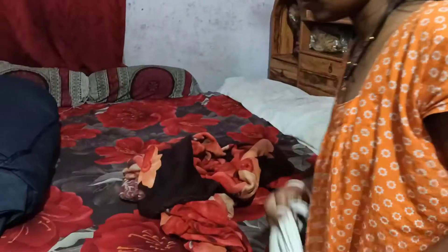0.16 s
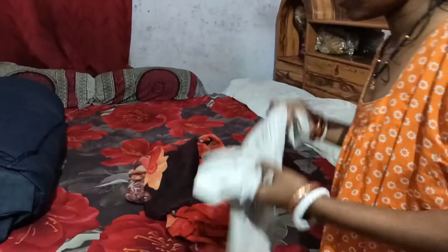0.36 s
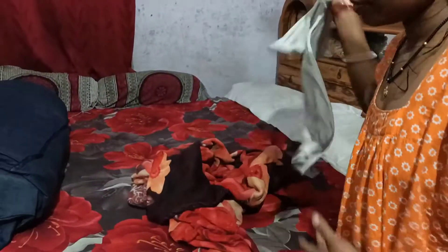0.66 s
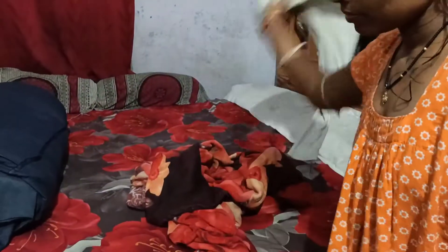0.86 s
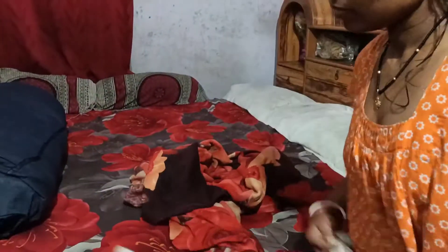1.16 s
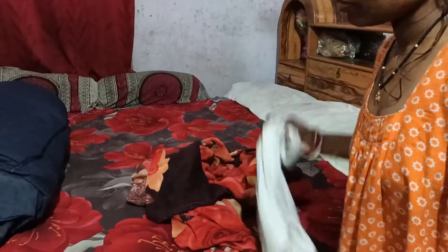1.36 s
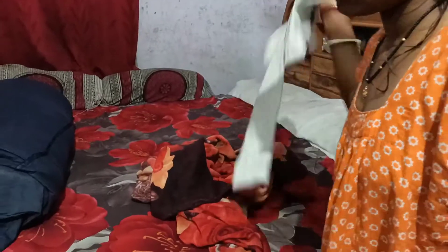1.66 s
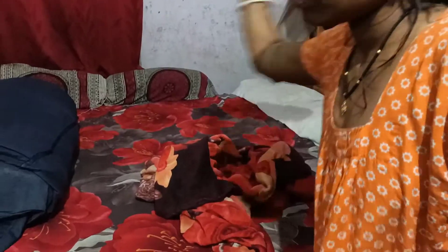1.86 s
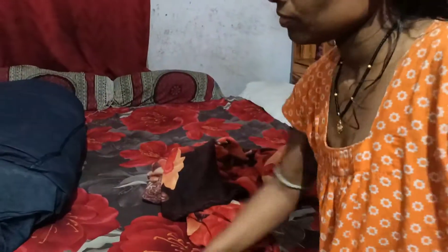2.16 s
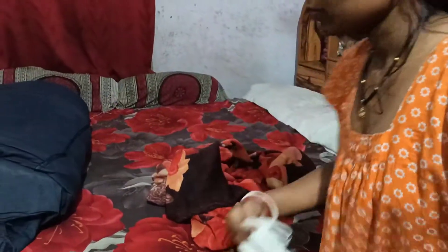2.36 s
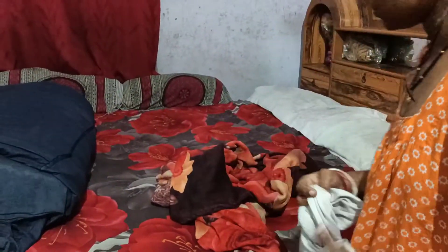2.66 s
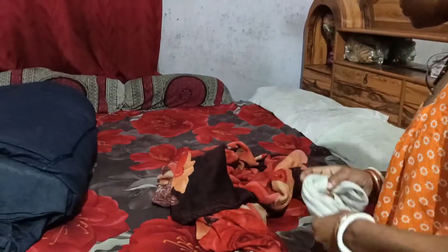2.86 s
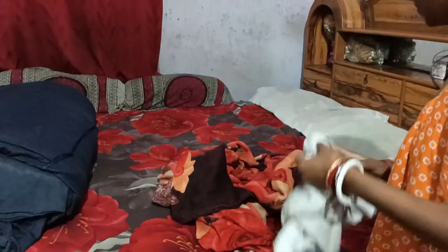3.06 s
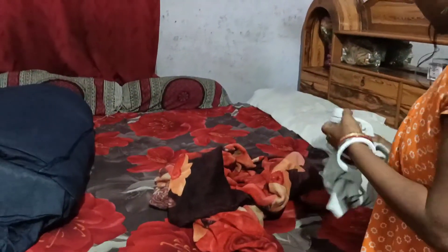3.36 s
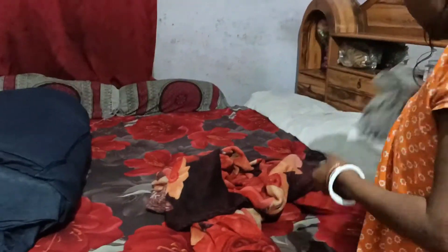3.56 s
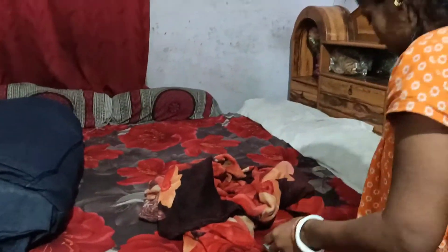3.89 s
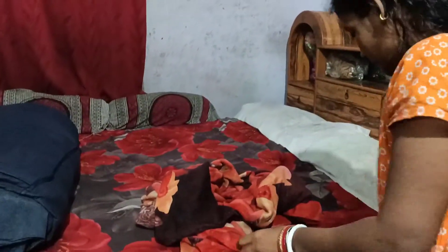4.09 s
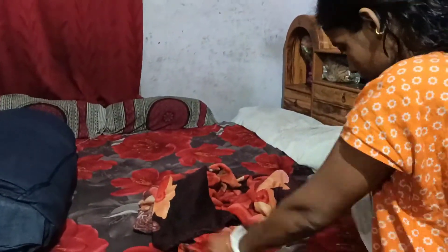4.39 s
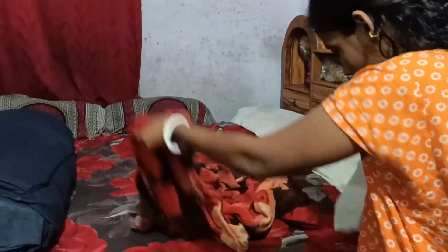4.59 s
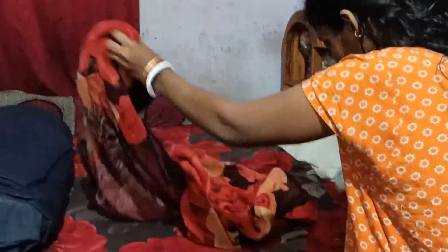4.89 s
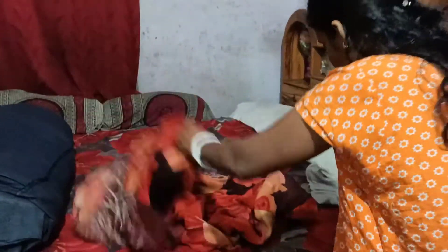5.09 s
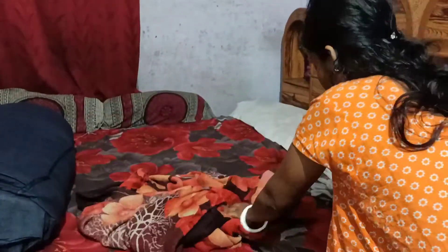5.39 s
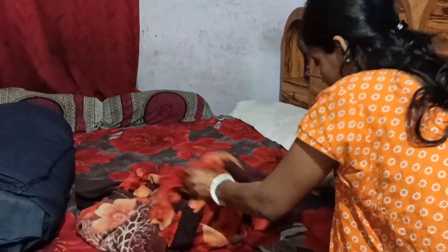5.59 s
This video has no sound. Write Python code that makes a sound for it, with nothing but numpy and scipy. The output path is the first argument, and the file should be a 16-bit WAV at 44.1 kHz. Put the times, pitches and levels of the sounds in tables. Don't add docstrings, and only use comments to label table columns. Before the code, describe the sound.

In a furnished bedroom, a cloth is shaken out with low thumping pops and whip-like cracks, the loudest around one and two seconds, as bangles rattle brightly. Then it quietens to sparse clicks and thin, short rings as hands gather and sort fabric. A distant horn toots very faintly outside. Close handheld stereo recorder, with dull low hum and noise suppression.

```python
import sys
import numpy as np
from scipy import signal
from scipy.io import wavfile
from scipy.ndimage import uniform_filter1d, minimum_filter1d

SR = 44100
rng = np.random.default_rng(int(sys.argv[2]) if len(sys.argv) > 2 else 0)


def digitize_waveform(pressure):
    field = np.atleast_2d(pressure).T
    bounded = np.clip(field, -1, 1)
    quanta = np.round(bounded * 32767).astype(np.int16)
    wavfile.write(sys.argv[1], SR, quanta)


def volts_from_db(level):
    exponent = np.asarray(level, float) / 20
    return 10 ** exponent


N = 253134

# (time [s], level [dB])
OPENING = [(0.0, -54), (0.59, -58.5), (0.8, -63), (1.04, -60.5), (1.3, -59), (1.49, -56.5), (1.61, -56.5),
           (1.76, -63.5), (2.03, -60), (2.58, -57), (2.68, -61.5), (2.88, -61), (3.42, -58.5), (3.6, -61),
           (4.28, -57), (5.28, -57.5), (5.36, -62), (5.74, -58.5)]
# (frequency [Hz], density [dB per Hz])
HUM_SPECTRUM = [(12, -46), (20, -16.5), (108, -6), (198, -22), (220, -20.5), (298, -12.5), (370, -18.5),
                (403, -15.5), (582, -19), (1950, -14), (2320, -26), (3070, -28), (3500, -27), (4550, -51),
                (7700, -120)]
# (time [s], level [dB])
GUSTS = [(0.0, -27), (1.13, -32), (1.49, -61.5), (2.26, -29), (2.581, -59.5), (4.14, -74)]
# (frequency [Hz], level in echoes [dB], t60 [s], level in hum [dB])
ROOM_MODES = [(53.7, 1.5, 0.55, -5.5), (100, -9, 0.45, 5), (134.4, 8.5, 0.19, -3), (185.5, -3, 0.44, -11),
              (228, -7.5, 0.36, -7), (300, 3.5, 0.24, 1), (330.4, 2, 0.28, -11.5), (421.5, -11, 0.46, 1),
              (468, -6.5, 0.38, -10), (540, -5, 0.13, -12), (540, -7, 0.094, -13.5)]
# (frequency [Hz], level [dB], t60 [s])
AFTERMATH = [(49.5, -32.5, 0.79), (128.6, -12.5, 0.23), (264, -28, 0.27), (358, -29.5, .2),
             (496.5, -31.5, 0.34)]
# (frequency [Hz], t60 [s])
ROOM_T60 = [(40, 0.6), (110, 0.38), (280, 0.32), (740, 0.29), (1940, 0.3), (5120, 0.25), (13500, 0.2)]
# (delay [s], level [dB])
ECHOES = [(.0058, -15), (.0105, -18), (.029, -19)]
# (frequency [Hz], correlation [-1..1])
LIKENESS = [(40, .99), (130, .93), (290, .86), (640, .7), (1410, -.15), (3100, 0), (15000, 0)]
# (start [s], end [s], pitch [Hz], level [dB], upper note level [dB])
TOOTS = [
    (1.945, 2.095, 925, -79, -86),
    (2.845, 3.03, 900, -77.5, -82.5),
    (5.535, 5.665, 925, -78, -95),
]
# (frequency [Hz], density [dB per Hz])
RUSTLE_SPECTRUM = [(1500, -20), (3000, -4), (5000, -5.5), (8000, -0.5), (12000, -7.5), (16000, -5)]
# (start [s], hold [s], level [dB], fall [dB per s])
HANDFULS = [(0.0, 0.018, -55, 155), (0.119, 0.039, -40.5, 230), (1.3, 0.027, -83, 93),
            (2.28, 0.06, -54, 301), (2.442, 0.036, -49.5, 247.5), (3.205, 0.13, -81.5, 58.5),
            (3.392, 0.053, -65, 203), (4.195, 0.16, -63, 30), (4.8, 0.42, -81, 154)]
# (time [s], level [dB])
SWISHES = [
    [(0.4, -100), (0.51, -69.5), (0.6, -94)],
    [(1.48, -80.5), (1.514, -88), (1.626, -83), (1.654, -97), (1.66, -92)],
    [(2.215, -27.5), (2.245, -41), (2.251, -34), (2.3, -47.5)],
    [(4.03, -68), (4.048, -56.5), (4.082, -46.5), (4.158, -49), (4.22, -79)],
]
# (time [s], peak [dB], pulse width [ms], right
# lag [ms], flutter re peak [dB])
SNAPS = [(0.001, -11.5, 0.67, -0.037, -9), (0.434, -55.5, 1.5, -0.022, -2),
         (1.112, -26.5, 0.44, -0.07, 3.5), (1.1212, -8.5, 0.39, -0.15, -10),
         (1.129, -15.5, 0.56, -0.17, -6), (1.476, -40.5, 0.38, 0.0091, -11), (2.239, -29.5, 1.305, 0.24, 8),
         (2.2524, -5, .48, .35, -12), (2.283, -8, 0.57, 0.052, -12), (2.3224, -15, 0.52, 0.23, -21),
         (2.418, -36, 0.74, 0.022, -9), (2.453, -59, 0.39, 0.091, -3), (4.084, -50, 0.43, 0.18, 7),
         (4.137, -27, 0.36, 0.066, -14), (4.148, -28, 1.77, 0.6, -25)]
# (frequency [Hz], density [dB per Hz])
FLUTTER_SPECTRUM = [(18, -36.5), (30, -11), (56, -8), (81, -18.5), (124, -6), (227, -10), (319, -4.5),
                    (364, -9), (426, -2.5), (702, -13.5), (1500, -14.5), (4300, -32.5), (16000, -47.5)]
# (time [s], peak [dB], pitch [Hz], right lag [ms], room level
# [dB])
CRACKS_AND_THUDS = [(1.1145, -15, 1800, -0.13, 7.5), (1.1213, -3, 1330, 0.17, -22.5),
                    (1.1242, -12.5, 330, -0.05, -9), (1.1212, -14, 2200, 0.019, -12.5),
                    (1.195, -15.5, 1190, -0.2, -13.5), (2.216, -33.5, 2370, 0.18, 12),
                    (2.2523, -9, 2550, 0.35, -2), (2.451, -35.5, 1710, 0.13, -10), (4.088, -30.5, 1246, 0.16, -2),
                    (4.3803, -37.5, 3300, -0.014, 0.5), (4.1374, -29.5, 2050, 0.15, -23),
                    (4.142, -32.5, 513, -0.075, -3.5), (2.258, -17.5, 490, -0.067, -4),
                    (1.1315, -20, 134, .1, -9), (1.1145, -27, 52, .05, -30), (1.146, -24, 1480, -.1, -2),
                    (1.135, -28, 2340, .1, 1.5), (4.0865, -44, 143, .05, -12), (4.106, -38, 178, .05, -12),
                    (4.1195, -38, 440, -.1, -3), (4.148, -30, 51.7, .05, -30), (4.172, -36, 129, .05, -18),
                    (4.191, -41, 496, .1, -7), (2.262, -26, 58, .05, -30), (4.0865, -39, 1030, 0.12, -6),
                    (4.141, -38, 800, .1, -1.5), (2.262, -20, 1800, .2, 1.5)]
# (frequency [Hz], level [dB], t60 [s])
HOOP_MODES = [
    [(5911, -10, .15), (8207, -1, .16), (10850, -4, .19), (13615, 0, .19)],
    [(2912, -13, .16), (3470, 0, .13), (3838, -11, .12), (4194, -9, .12), (4632, -7, .13)],
    [(6735, -5, .14), (9168, -8, .09), (15045, 0, .1)],
    [(6930, -16, .1), (9170, -5, .1), (9400, -6, .16), (9600, -5, .15), (11940, -11, .12)],
]
BEAT_DEPTH = [.25, .3, .3, .9]
# (time [s], level [dB], tilt [dB per octave], share of free t60 left by skin [ratio])
THIN_RINGS = [ (.0945, -62, 9, .5), (2.4787, -64, 0, .9), (3.256, -64, -11, 0.84), (3.3849, -54, -3, .9),
              (3.503, -68, 7, 0.93), (3.677, -80.5, -1, .9), (3.7783, -81, -5, 0.95),
              (3.8521, -68, 0, 0.86), (4.234, -51.5, 3, .8), (4.3804, -74, -3, .9), (4.787, -77, 0, .9),
              (4.978, -51, 0, .8), (5.0717, -47, -1, .9), (5.171, -57, -4, .9), (5.1956, -72, 4, 0.83)]
# (time [s], level [dB], tilt [dB per octave], share of free t60 [ratio])
SLACK_RINGS = [ (.196, -54, 3, 1.1), (2.4787, -59, 0, 1), (3.256, -75, -2, 0.92), (3.3847, -72, 13, 0.97),
               (3.503, -71, 0, 0.94), (3.8522, -63, 0, .9), (4.234, -73, 0, .9), (4.3807, -51.5, -4, 0.84),
               (4.533, -86, 0, 0.95), (4.787, -74.5, -2, .9), (4.9777, -77, 3, .6), (5.082, -59, -2, 0.82),
               (5.171, -73, 2, .9), (5.2101, -68, -4, .9), (5.563, -72.5, 5.5, 0.78)]
# (time [s], level [dB], tilt [dB per octave], share of free t60 [ratio])
SMALL_RINGS = [ (.183, -54, 4, .9), (2.4787, -57, -1, .9), (2.8774, -71.5, 2.5, 0.86),
               (3.3847, -47.5, 5, 1.04), (3.8522, -66, 3, .9), (4.234, -59, 8, .9), (4.3804, -53, 8, .9),
               (4.533, -63, -9, .9), (4.6584, -65, 8, .9), (4.787, -55.5, -8, 0.76), (4.897, -66, 13, 1),
               (4.9777, -57.5, 12.5, 1.13), (5.0719, -68, 0, .9), (5.099, -60, -8, .9),
               (5.171, -59, -11.5, 1.2), (5.1956, -66, -5, .9)]
# (time [s], level [dB], tilt [dB per octave], share of free t60 [ratio])
WIDE_RINGS = [ (0.1372, -50, 0, .9), (.183, -37.5, 0, .9), (0.1963, -39, 1, 1.14), (2.4787, -53, 6, .9),
              (3.3847, -50, 2, .8), (3.503, -58.5, 0, .9), (3.8522, -72, -2, .9), (4.234, -71, 0, .9),
              (4.3804, -37.5, 7, .7), (4.6055, -47.5, -8, .55), (4.6584, -58, -4, .6),
              (4.787, -72, 0, 0.95), (4.897, -64, 7, 1.2), (4.9777, -49, 8, 0.64), (5.0719, -44.5, 0, 0.63),
              (5.171, -54, 0, .6), (5.2101, -51, 2, .7), (5.5632, -70, 0, 0.86)]
# (time [s], peak [dB], tick pitch [Hz], room re tick [dB])
DULL_KNOCKS = [(0.0364, -53, 4050, -6.5), (0.0944, -40, 7000, -27), (4.047, -44.5, 7130, 11),
               (1.195, -35, 4330, 1.5), (1.3077, -43, 6200, -1), (1.475, -66.5, 4700, 6),
               (2.2674, -26, 6760, 2.5), (2.4171, -33.5, 6880, 2.5), (2.5253, -36.5, 6960, -11),
               (2.8774, -46, 7100, 1.5), (2.9018, -48, 7040, 3.5), (3.2071, -59, 6600, 9),
               (3.256, -49, 5820, 5.5), (3.3749, -39, 7040, -4), (3.7309, -64.5, 7200, 12),
               (4.595, -57, 8200, 4), (4.7202, -46.5, 7120, -0.5), (5.1957, -30.5, 7100, 1.5),
               (5.5628, -42.5, 6300, 3)]
# (time [s], peak [dB], tick pitch [Hz], room re tick [dB])
FLUNG_KNOCKS = [(0.0749, -33.5, 15200, -2), (0.1122, -18, 14400, -2), (0.1397, -33, 10100, -4),
                (0.1747, -25.5, 14600, 7), (0.184, -16.5, 15100, -3.5), (0.1962, -31.5, 9600, -12.5),
                (0.2134, -28.5, 10150, -13), (1.0876, -45, 9800, 5), (1.0933, -42.5, 9000, -14.5),
                (1.1073, -13, 14400, 4), (1.3292, -52, 9600, -1), (2.0504, -45.5, 11670, 4.5),
                (2.173, -33.5, 8990, -4), (2.2156, -15, 10180, -1.5), (2.224, -22.5, 9800, -10),
                (2.4376, -41, 9700, -17), (2.4602, -39, 9500, -15), (2.4784, -20.5, 11760, -7.5),
                (2.5014, -42, 9480, -1), (2.5325, -40.5, 9500, 7), (4.9777, -43.5, 15350, 12)]
# (time [s], peak [dB], pan [dB], room re tick [dB])
SLIDING_KNOCKS = [(3.1115, -56.5, -5, 3.5), (3.3848, -33, 6, -1), (3.4681, -54, 1, 12),
                  (3.505, -49, -8, 9.5), (3.5144, -48, -5, -9), (3.778, -55, 5.5, 4), (3.8517, -36, 3, 1.5),
                  (4.2355, -34, 4, -2.5), (4.3025, -44.5, -11, -9), (4.3364, -54.5, 9, 12),
                  (4.363, -39, -3, 4.5), (4.38, -28.5, 6.5, 7), (4.3911, -39, 8.5, -18),
                  (4.5072, -57, 15, 14), (4.5328, -33.5, 5, -4), (4.567, -55, 16, -3),
                  (4.6071, -36, 6.5, -8), (4.6595, -45.5, 7.5, 1), (4.7728, -50.5, 7, 10),
                  (4.787, -35.5, 6, 0.5), (4.8, -46, 0, -15), (4.8957, -62, -1, 4), (5.0717, -32, 4.5, -3),
                  (5.1703, -49, 9, 8), (5.2044, -44, 6.5, 3.5), (5.2121, -42.5, 12.5, -7),
                  (5.2287, -38.5, 3.5, -6), (5.5207, -62.5, -7, 12.5), (5.5757, -42.5, 3.5, 3)]
# (time [s], peak [dB], tick pitch [Hz], room re tick [dB])
PINGS = [(.1402, -22.5, 12000, -6), (0.21, -29.5, 6850, -15), (.1842, -18.5, 13000, -3),
         (.1975, -28.5, 13900, -10), (2.4404, -42, 7000, -5), (2.462, -42, 6800, -7),
         (2.4795, -37, 7100, -13), (2.502, -44, 11200, -10), (3.2075, -53, 15200, -4),
         (3.8522, -36, 5500, -9), (4.2352, -48, 3520, -3), (4.3808, -26, 4810, -9),
         (4.3808, -26, 12900, -3), (4.5335, -44, 14100, -6), (4.787, -39, 8900, -8), (6.2, -32.5, 7830, 7),
         (4.9785, -36, 6800, -16), (4.8, -29, 11000, -1), (5.0725, -29, 11700, -4),
         (4.0915, -39, 2000, -10), (0.18, -35, 6950, -9.5), (.1372, -30, 13700, -8.5),
         (.1122, -32, 12000, -8), (4.8, -41, 4200, -2), (4.3815, -36, 8300, -7), (4.2352, -40, 12300, -8),
         (4.6594, -44, 9960, -8), (4.612, -44, 6800, -3), (4.612, -50, 5200, -3), (4.778, -46, 14200, -4),
         (4.7725, -52, 8100, -6), (4.5, -50, 7500, -4), (5.1965, -42, 11700, -6), (4.2, -44, 8400, -8),
         (4.7215, -54, 9600, -8), (0.98, -51.5, 3400, -4), (.1985, -28, 14800, -9), (4.0905, -44, 2600, -4),
         (5.1705, -44, 9500, -12), (5, -36, 9500, -12)]
# (tick pitch [Hz], pan [dB])
SIDE_OF_PITCH = [(4500, -0.4), (7000, -3), (9600, 5.5), (11800, -3), (15000, -3)]
# (frequency [Hz], width [Hz], gain [dB])
PORTS = [
    [(88, 35, -5), (760, 350, -7), (6850, 1200, -27), (8100, 700, 2.5), (9600, 1500, 13), (12400, 1500, 3),
     (14900, 3200, -20)],
    [(88, 35, -5), (760, 350, -7), (6900, 1500, 8), (7950, 400, -1), (10050, 2000, -24), (12400, 1500, 3),
     (15200, 900, 7)],
]

DULL_CRACK_DB, FLUNG_CRACK_DB, SLIDING_CRACK_DB, PING_CRACK_DB = 8, 3.5, 5.5, -13.5
WAVE_LAG_S = 0.00017
TOOT_DIRECT_DB = 12.3
TOP_CUTOFF_HZ = 15430


def rms_one(x):
    return x / np.sqrt(np.mean(x ** 2) + 1e-20)


def in_time(rows):
    s, level = np.transpose(rows)
    return np.interp(np.arange(N) / SR, s, level)


def at_hz(points, hz):
    points_hz, values = np.transpose(points)
    return np.interp(np.log(hz), np.log(points_hz), values)


def drift(rate_hz, size):
    r = np.exp(-80 * np.pi * rate_hz / SR)
    white = rng.standard_normal(size // 40 + 2002)
    slow = signal.lfilter([1], [1, -2 * r, r * r], white)[2000:]
    return np.interp(np.arange(size) / 40, np.arange(len(slow)), rms_one(slow))


def diffuse(size, gain):
    out, edges_hz = 0, 18 * 2 ** np.arange(0, 10.1, .5)
    white = rng.standard_normal((2, 2, size + 4000))
    for k, (low, high) in enumerate(zip(edges_hz, edges_hz[1:])):
        band = signal.butter(2, [low, high], "band", fs=SR, output="sos")
        mid, side = signal.sosfilt(band, white[k % 2])[:, 4000:]
        hz = np.sqrt(low * high)
        alike = np.clip(at_hz(LIKENESS, hz), -1, 1)
        stereo = np.sqrt(1 + alike) * mid + np.sqrt(1 - alike) * side * [[1], [-1]]
        out = out + gain(hz) * stereo
    return out


def add(track, sound, s):
    i = max(round(s * SR), 0)
    track[..., i:i + sound.shape[-1]] += sound[..., :N - i]


def swell(start_s, rise_s, hold_s, db, fall_db_per_s):
    t = np.arange(N) / SR - start_s
    fall_db = fall_db_per_s * np.maximum(t - hold_s, 0)
    return np.clip(t / rise_s + 1, 0, 1) ** 2 * volts_from_db(db - fall_db)


def standing_waves(level_column):
    t, waves = np.arange(SR // 2) / SR, 0
    for k, mode in enumerate(ROOM_MODES):
        hz, t60_s = mode[0], mode[2]
        lag_s = WAVE_LAG_S * (-1) ** k * np.array([[1], [-1]])
        waves = waves + volts_from_db(mode[level_column] - 60 * t / t60_s) * np.sin(2 * np.pi * hz * (t + lag_s))
    return waves / np.sqrt(np.sum(waves ** 2) / 2)


def room_response(first_s, lumps_db, modes_db):
    t = np.arange(SR // 2) / SR
    tail = diffuse(len(t), lambda hz: volts_from_db(-60 * t / at_hz(ROOM_T60, hz) - 2.2 * (hz < 600)))
    lumps = volts_from_db(lumps_db * np.exp(-t / 0.093) * drift(190, len(t)))
    tail = tail * lumps * np.clip(t / first_s - 1, 0, 1)
    tail = tail / np.sqrt(np.sum(tail ** 2) / 2) + volts_from_db(modes_db) * standing_waves(level_column=1)
    for k, (delay_s, db) in enumerate(ECHOES):
        right_lag = 9 * (-1) ** k
        tail[[0, 1], round(delay_s * SR) + np.array([0, right_lag])] += volts_from_db(db)
    return tail


def room_hum(patchy_db, boom_db):
    open_db = in_time(OPENING)
    together = drift(9.2, N)
    hum = rms_one(diffuse(N, lambda hz: volts_from_db(at_hz(HUM_SPECTRUM, hz) + patchy_db * (together + drift(2.2, N)))))
    low = signal.sosfilt(signal.butter(2, 750, fs=SR, output="sos"), hum)
    excitation = rng.standard_normal((1, N + SR))
    boom = signal.fftconvolve(excitation, standing_waves(level_column=3), axes=1)[:, SR:N + SR]
    bass = rms_one(rms_one(low) + volts_from_db(boom_db + patchy_db * together) * boom)
    gusts = sum(swell(s, .012, 0, db, 190) for s, db in GUSTS)
    upper = volts_from_db(-68 + 1.6 * (open_db - open_db.mean()))
    return (volts_from_db(open_db) + gusts) * bass + upper * rms_one(hum - low)


def aftermath():
    t = np.arange(N) / SR + WAVE_LAG_S * np.array([[1], [-1]])
    return sum(volts_from_db(db - 60 * t / t60_s) * np.sin(2 * np.pi * hz * t) for hz, db, t60_s in AFTERMATH)


def horn(interval, upper_late_s, sag_per_s):
    out, t = np.zeros(N), np.arange(N) / SR
    waver = .011 * drift(45, N)
    for start, end, hz, db, upper_db in TOOTS:
        sag = sag_per_s * (t - (start + end) / 2)
        turns = 2 * np.pi * np.cumsum(1 + waver - sag) / SR
        for begin, note_hz, note_db in (start, hz, db), (start + upper_late_s, hz * interval, upper_db):
            gate = np.clip(np.minimum(t - begin, end - t) / 0.025, 0, 1)
            note = np.sin(note_hz * turns)
            if note_hz == hz:
                note = note + .3 * np.sin(1.118 * note_hz * turns)
            out += gate * volts_from_db(note_db + 4.5 * drift(30, N)) * note
    return out


def swish_gain():
    t, gain = np.arange(N) / SR, 0
    for rows in SWISHES:
        edge = np.clip(np.minimum(t - rows[0][0], rows[-1][0] - t) / 0.0056, 0, 1)
        gain = gain + edge * volts_from_db(in_time(rows))
    return gain


def cloth_rustle(floor_db, swish_cut_hz):
    grains = volts_from_db(3.3 * drift(91, N))
    rustle = grains * diffuse(N, lambda hz: volts_from_db(at_hz(RUSTLE_SPECTRUM, hz) - 40 * (hz < 1400)))
    handfuls = sum(swell(s, .057, hold_s, db, fall) for s, hold_s, db, fall in HANDFULS)
    airy = rms_one(signal.sosfilt(signal.butter(1, swish_cut_hz, "high", fs=SR, output="sos"), rustle))
    return (volts_from_db(floor_db) + handfuls) * rms_one(rustle) + swish_gain() * airy


def cracks_and_thuds(decay_cycles):
    near, sent = np.zeros((2, N)), np.zeros(N)
    t = np.arange(SR // 5) / SR
    for s, peak_db, hz, lag_ms, room_db in CRACKS_AND_THUDS:
        sound = -volts_from_db(peak_db) * np.sin(2 * np.pi * hz * t) * np.exp(-t * hz / decay_cycles)
        add(near[0], sound, s)
        add(near[1], sound, s + lag_ms / 1000)
        add(sent, sound * volts_from_db(room_db), s)
    return near, sent


def cloth_snaps(flutter_s, room_db, room_per_flutter):
    near, sent = np.zeros((2, N)), np.zeros(N)
    t = np.arange(SR // 8) / SR
    flaps = diffuse(len(t) * len(SNAPS), lambda hz: volts_from_db(at_hz(FLUTTER_SPECTRUM, hz)))[0]
    flaps = rms_one(flaps).reshape(len(SNAPS), -1)
    for (s, peak_db, width_ms, lag_ms, flutter_db), flap in zip(SNAPS, flaps):
        u = t * 1000 / width_ms - 3
        pulse = u * np.exp(.5 - u ** 2 / 2)
        flutter = volts_from_db(flutter_db) * flap * np.exp(-t / flutter_s) * np.minimum(t / 0.00068, 1)
        sound = volts_from_db(peak_db) * (pulse + flutter)
        start_s = s - width_ms / 500
        add(near[0], sound, start_s)
        add(near[1], sound, start_s + lag_ms / 1000)
        add(sent, sound * volts_from_db(room_db + room_per_flutter * flutter_db), start_s)
    return near, sent


def hoop_rings(scatter_db, split):
    out, t = np.zeros(N), np.arange(SR // 3) / SR
    chance = rng.standard_normal((4, 18, 5, 1))
    rings = [THIN_RINGS, SLACK_RINGS, SMALL_RINGS, WIDE_RINGS]
    for modes, rows, depth, draws in zip(HOOP_MODES, rings, BEAT_DEPTH, chance):
        hz, mode_db, t60_s = np.transpose(modes)[:, :, None]
        octaves = np.log2(hz / np.exp(np.log(hz).mean()))
        stops = [row[0] for row in rows[1:]] + [N / SR]
        for (s, level_db, tilt_db, share), stop, draw in zip(rows, stops, draws[:, :len(modes)]):
            decay_db = 60 * t / (t60_s * np.clip(share, .2, 2))
            strengths = volts_from_db(level_db + mode_db + tilt_db * octaves + scatter_db * draw - decay_db)
            slow_beat = .2 * np.cos(2 * np.pi * hz * split * t + 3 * draw)
            fast_beat = .4 * np.cos(5.1 * np.pi * hz * split * t - 5 * draw)
            beats = 1 + depth * (slow_beat + fast_beat)
            held = np.clip((stop - s - t) / .003 + 1, 0, 1)
            add(out, held * np.sum(strengths * beats * np.sin(2 * np.pi * hz * t), axis=0), s)
    return out


def bangle_knocks(tick_ms, crack_hz, sliding_hz, sliding_spread):
    near, sent = np.zeros((2, 2, N))
    t = np.arange(500) / SR
    knocks = []
    for rows, crack_db in (DULL_KNOCKS, DULL_CRACK_DB), (FLUNG_KNOCKS, FLUNG_CRACK_DB):
        knocks += [(s, db, at_hz(SIDE_OF_PITCH, hz), hz, crack_db, room_db) for s, db, hz, room_db in rows]
    slide_hz = sliding_hz * (1 + sliding_spread * rng.standard_normal(len(SLIDING_KNOCKS)))
    for (s, db, pan_db, room_db), hz in zip(SLIDING_KNOCKS, slide_hz):
        knocks.append((s, db, pan_db, hz, SLIDING_CRACK_DB, room_db))
    bright = signal.butter(2, crack_hz, "high", fs=SR, output="sos")
    cracks = signal.sosfilt(bright, rng.standard_normal((len(knocks), len(t))))
    knocks += [(s, db, at_hz(SIDE_OF_PITCH, hz), hz, PING_CRACK_DB, room_db) for s, db, hz, room_db in PINGS]
    cracks = np.vstack([cracks, cracks[:len(PINGS)]])
    shape = np.exp(-t * 1000 / np.clip(tick_ms, .2, 3)) * np.minimum(t / 0.000067, 1)
    for (s, peak_db, pan_db, tick_hz, crack_db, room_db), crack in zip(knocks, cracks):
        tick = np.sin(2 * np.pi * tick_hz * t)
        knock = volts_from_db(peak_db - 8.5) * shape * (tick + volts_from_db(crack_db) * crack)
        lag_s = np.clip(1.1 * pan_db, -8, 12) / SR
        add(near[0], knock * volts_from_db(pan_db), s)
        add(near[1], knock * volts_from_db(-pan_db * 0.52), s + lag_s)
        add(sent, knock * volts_from_db(room_db + pan_db * np.array([[.15], [-.15]])), s)
    return near, sent


def scene():
    background = room_hum(patchy_db=0.5, boom_db=-5.0) + aftermath()
    toots = horn(interval=1.245, upper_late_s=.052, sag_per_s=.16)
    rustle = cloth_rustle(floor_db=-87, swish_cut_hz=7400)
    hem, hem_sent = cracks_and_thuds(decay_cycles=2.2)
    cloth, cloth_sent = cloth_snaps(flutter_s=0.015, room_db=2, room_per_flutter=.39)
    rings = hoop_rings(scatter_db=1.5, split=.003)
    metal, metal_sent = bangle_knocks(tick_ms=1.96, crack_hz=4753, sliding_hz=9500, sliding_spread=.046)
    sent = metal_sent + cloth_sent + hem_sent + volts_from_db(-2.0) * rings + volts_from_db(TOOT_DIRECT_DB - 11.5) * toots
    room = room_response(first_s=0.0035, lumps_db=2.5, modes_db=-13.0)
    echoes = signal.fftconvolve(sent, room, axes=1)[:, :N]
    return metal + cloth + hem + rings + volts_from_db(TOOT_DIRECT_DB) * toots + echoes + rustle + background


def band_dropouts(x, masked_db, from_hz, loss_db):
    hz, _, z = signal.stft(x, SR, nperseg=1024, noverlap=768)
    power = uniform_filter1d(np.sum(np.abs(z) ** 2, axis=0), size=7, axis=1) + 1e-20
    own = uniform_filter1d(power, size=5, axis=0)
    around = uniform_filter1d(power, size=35, axis=0)
    outside = (hz[:, None] < from_hz) | (hz[:, None] > TOP_CUTOFF_HZ - 900)
    patches = rng.random((len(hz) // 6 + 1, z.shape[2] // 10 + 1)) > .14
    spared = np.kron(patches, np.ones((6, 10)))[:len(hz), :z.shape[2]] > 0
    kept = (own > around * volts_from_db(-2 * masked_db)) | outside | spared
    kept = minimum_filter1d(minimum_filter1d(1. * kept, size=3, axis=0), size=5, axis=1)
    return signal.istft(z * np.maximum(kept, volts_from_db(loss_db)), SR, nperseg=1024, noverlap=768)[1][:, :N]


def top_cut(x):
    return signal.sosfilt(signal.butter(12, 16510, fs=SR, output="sos"), x)


def record(dry):
    ports = []
    for x, port in zip(dry, PORTS):
        for hz, width_hz, db in port:
            w, a = 2 * np.pi * hz / SR, volts_from_db(db / 2)
            q = np.sin(w) * width_hz / hz / 2
            b = [1 + q * a, -2 * np.cos(w), 1 - q * a]
            x = signal.lfilter(b, [1 + q / a, -2 * np.cos(w), 1 - q / a], x)
        ports.append(x)
    cleaned = band_dropouts(np.array(ports), masked_db=4.3, from_hz=2400, loss_db=-30)
    top = signal.ellip(8, .5, 35, TOP_CUTOFF_HZ, fs=SR, output="sos")
    bottom = signal.butter(2, 38, "high", fs=SR, output="sos")
    mix = signal.sosfilt(np.vstack([top, bottom]), cleaned)
    return top_cut(mix)


dry = scene()
out = record(dry)
digitize_waveform(out)
```